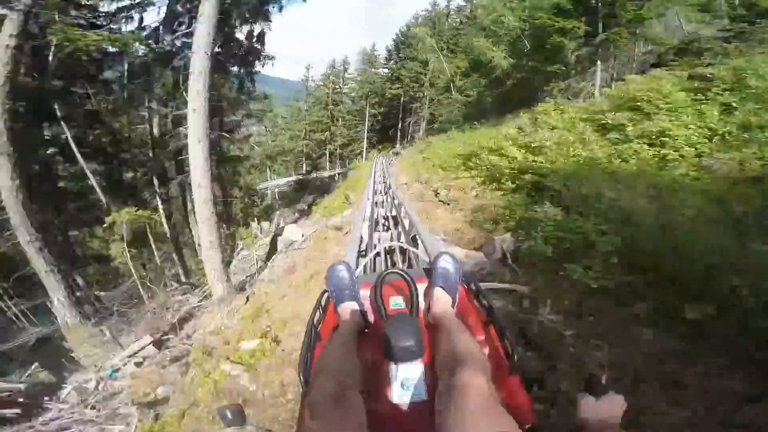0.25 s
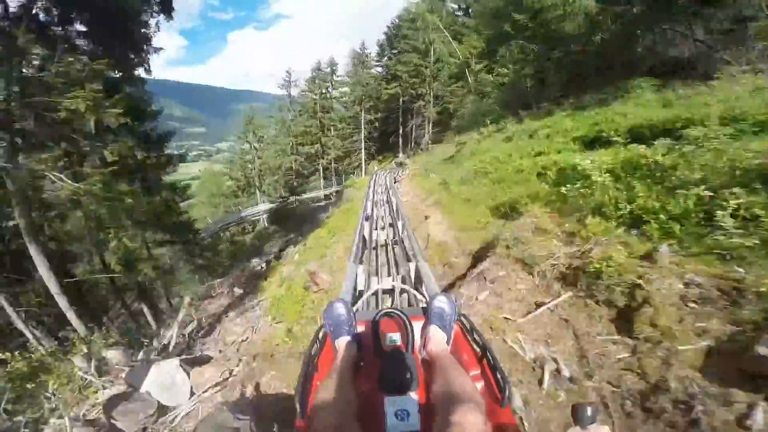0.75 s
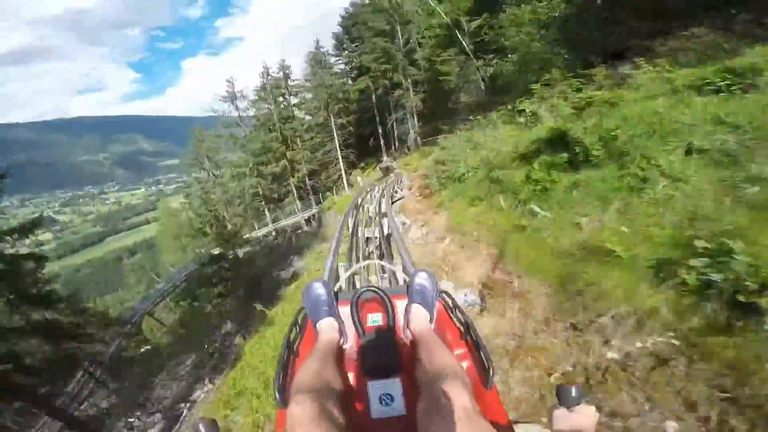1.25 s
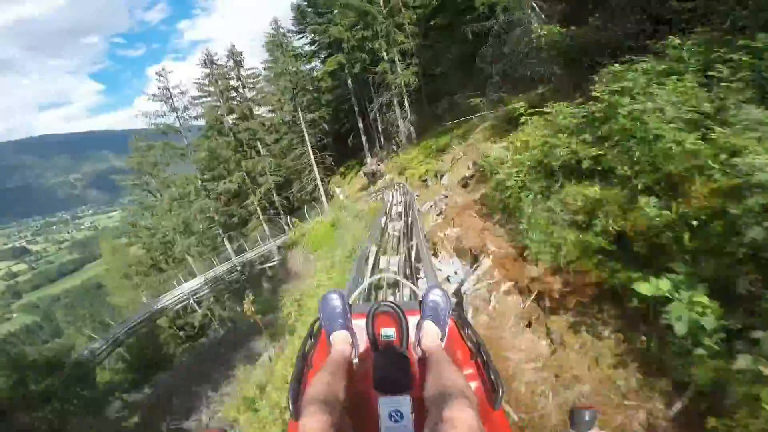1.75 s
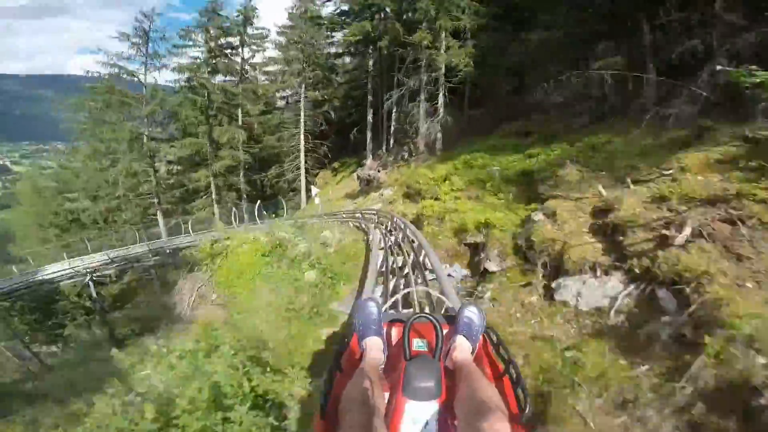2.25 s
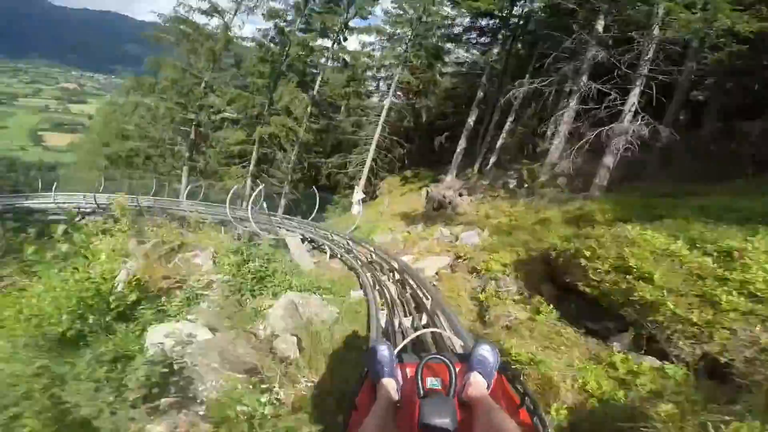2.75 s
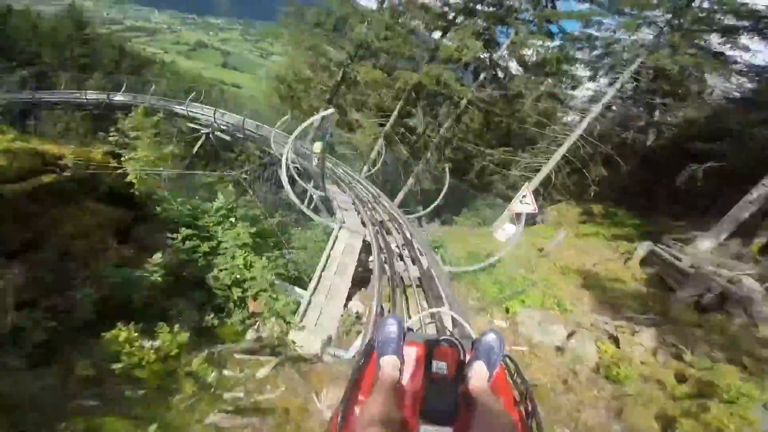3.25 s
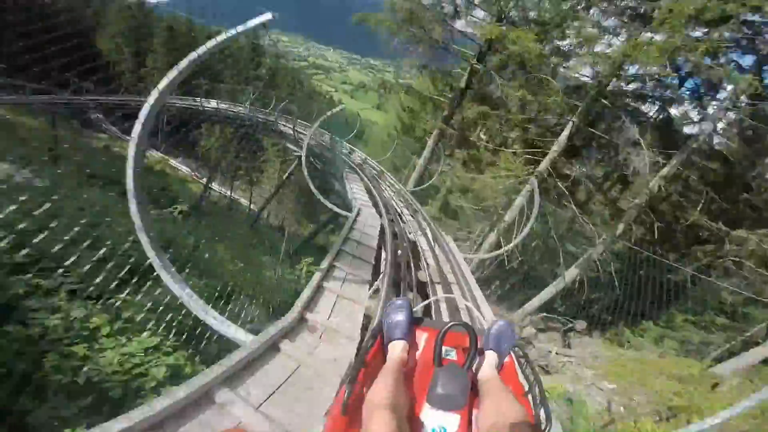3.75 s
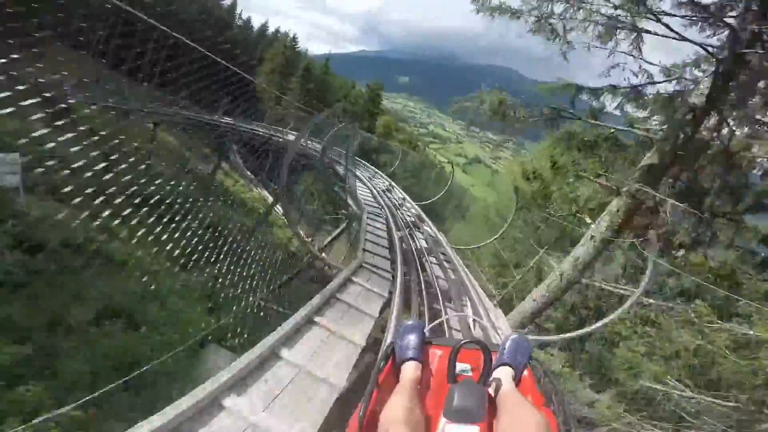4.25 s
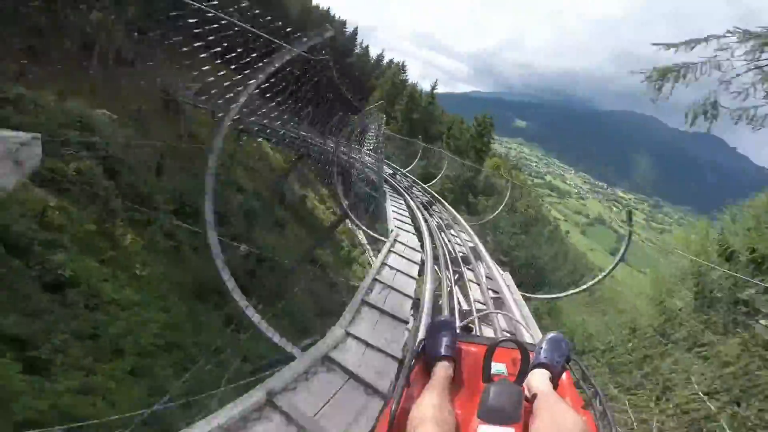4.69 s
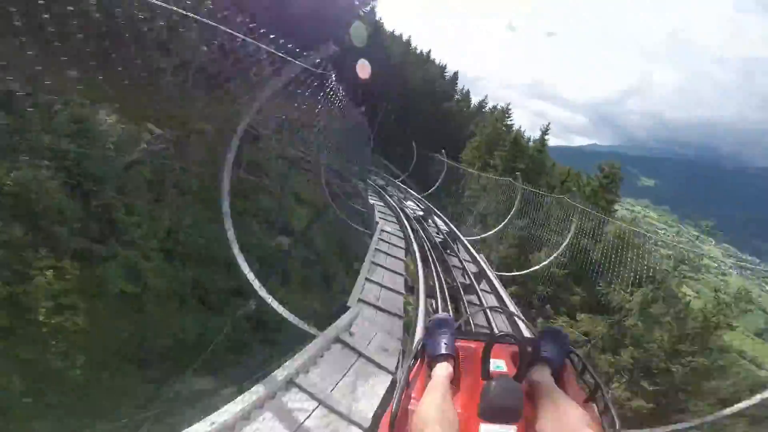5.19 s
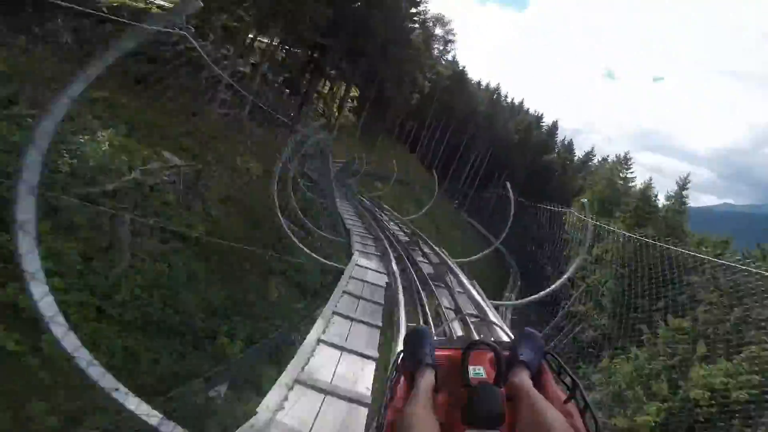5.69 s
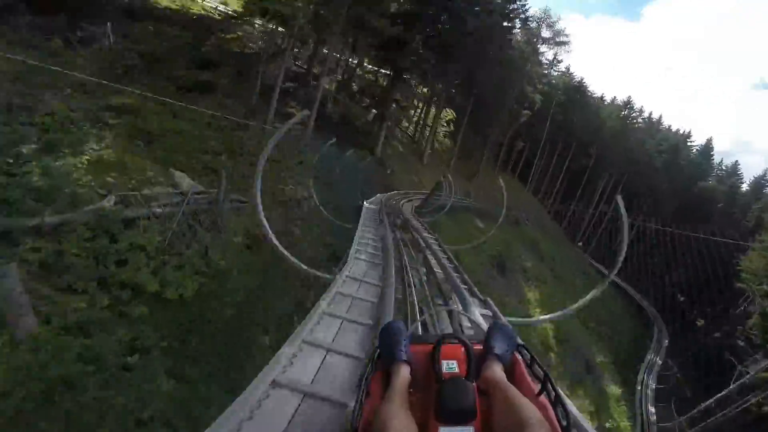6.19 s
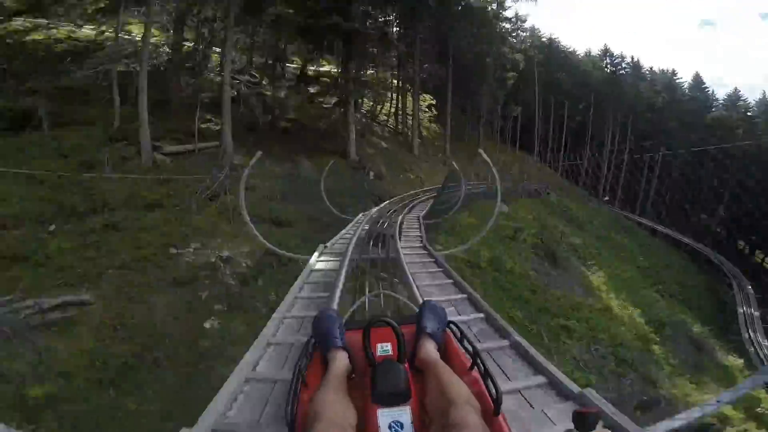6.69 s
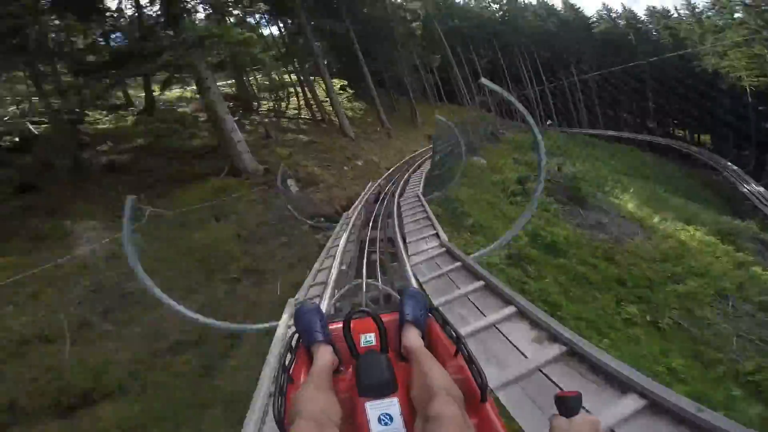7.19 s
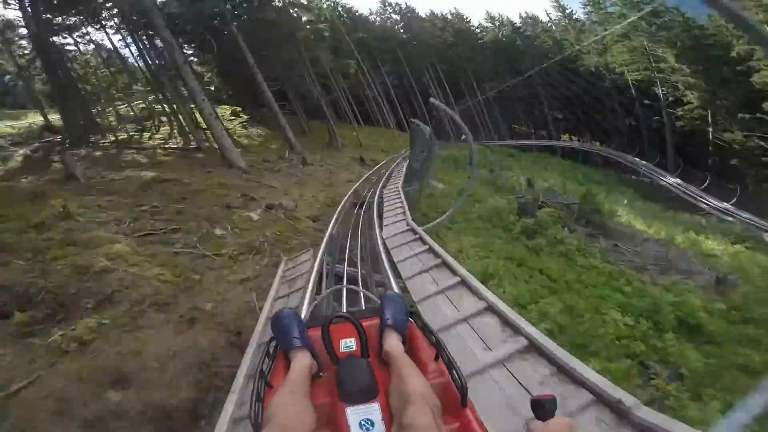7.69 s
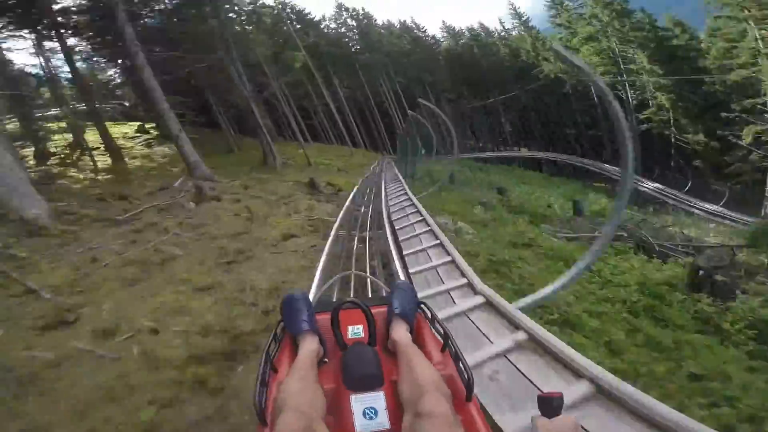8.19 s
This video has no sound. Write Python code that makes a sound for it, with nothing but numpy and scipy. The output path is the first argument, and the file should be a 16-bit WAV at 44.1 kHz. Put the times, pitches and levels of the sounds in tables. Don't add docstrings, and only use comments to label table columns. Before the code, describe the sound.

Close, boxy wheel roar on steel track with low buffeting, rhythmic rasping, scattered joint knocks, scuffs, crackles and a few faint high squeaks.

```python
import sys
import numpy as np
from scipy import signal
from scipy.fft import rfft, irfft, next_fast_len
from scipy.io import wavfile
from scipy.ndimage import uniform_filter1d, map_coordinates

SR = 44100
rng = np.random.default_rng(int(sys.argv[2]) if len(sys.argv) > 2 else 0)


def attenuation_scalar(level_db):
    decades = np.asarray(level_db, float) / 20
    return 10 ** decades


def int16_out(signal):
    q = np.round(np.clip(np.atleast_2d(signal).T, -1, 1) * 32767)
    wavfile.write(sys.argv[1], SR, q.astype(np.int16))


N = 372204

CLOCK_HZ = 2926.6

# time_s, wheel_turns
WHEEL = [(0.0, 0.31), (0.6, 15.79), (0.9, 23.65), (2.7, 71.4), (3.0, 79.01), (3.3, 85.8), (3.6, 92.16),
         (3.9, 98.96), (4.2, 105.44), (5.4, 133.48), (5.7, 140.08), (6.3, 153.68), (6.6, 160.64),
         (6.9, 167.83), (7.2, 174.68), (7.8, 189.19), (8.44, 205.13)]
# time_s, roar_db
LOAD = [(0.0, -44.5), (0.45, -43.5), (0.7, -42), (1.36, -43.5), (1.53, -43), (2.47, -44.5), (2.75, -41.5),
        (3.1, -44.5), (3.24, -44), (4.63, -45), (4.89, -46.5), (5.26, -45), (5.5, -48), (5.85, -46),
        (5.97, -48.5), (6.28, -47.5), (6.42, -47.5), (8.44, -47.5)]
# peak_s, peak_db, rise_and_fall_s
SHUDDERS = [(.08, -23.5, 0.053), (.44, -27.5, .03), (.9, -16, 0.032), (1.07, -17.5, 0.048),
            (1.18, -30, 0.018), (1.36, -25.5, .03), (1.62, -27, 0.033), (2.22, -30, 0.055),
            (2.37, -22, 0.032), (2.76, -30, 0.056), (2.93, -26.5, 0.065), (3.15, -24, 0.024),
            (3.34, -25.5, 0.064), (3.55, -20, 0.026), (3.67, -22.5, 0.026), (3.79, -23.5, 0.035),
            (4.03, -37, 0.045), (4.66, -29.5, 0.063), (5.03, -31, .06), (5.19, -24.5, 0.041),
            (5.52, -30, 0.096), (5.83, -31.5, 0.29), (6.28, -22, 0.039), (6.53, -26, 0.14),
            (6.81, -23.5, 0.028), (6.92, -24, 0.025), (7.52, -24, 0.041), (8.12, -26, 0.17),
            (8.35, -30.5, 0.027)]
# start_s, peak_db, pitch_hz, damping_per_cycle
JOLTS = [(3.155, -15, 189, 1.6), (3.245, -18.5, 170, 0.8), (3.278, -5.5, 111, 0.83),
         (3.293, 1.5, 43.4, 0.84), (3.3, -12.5, 208, 1.9), (3.531, -9.5, 39, 0.63),
         (3.5557, -2.5, 37.9, 1.1), (3.598, -13.5, 198, 1.36), (3.806, -14.5, 111, 1.7),
         (3.966, -14.5, 178, 0.67), (3.988, -11, 105, 1.3), (3.994, -24.5, 216, 0.36),
         (4.0, -9.5, 41.4, .9), (4.011, -10, 101, 1.04), (4.015, -22.5, 213, 0.47), (6.284, -9, 53, 0.86)]
# freq_hz, density_db
ROAR = [(200, -10.5), (330, -3.5), (600, -7.5), (900, -9), (1300, -3.5), (2100, -8.5), (3000, -11),
        (3900, -25.5), (5000, -36.5), (9000, -90)]
# freq_hz, density_db
FIZZ = [(2500, -10), (3400, -1), (4000, -9.5), (5000, -15), (6500, -10.5), (8000, -18.5), (10000, -25),
        (15000, -33)]


def unit(x):
    return x / np.sqrt(np.mean(x ** 2) + 1e-20)


def curves(rows):
    s, *cols = np.transpose(rows)
    return [np.interp(np.arange(N) / SR, s, c) for c in cols]


def wobble(rate):
    knots = rng.standard_normal(int(N * rate / SR) + 4)
    return map_coordinates(knots, [np.arange(N) * rate / SR])


def coloured(x, spectrum, housed=True):
    # centre_hz, width_hz, lift_db
    resonances = [(510, 66, 5.5), (726, 140, 5.5), (1643, 410, 6), (2466, 410, 9), (2803, 200, 4.5),
                  (3153, 140, 3.5), (3685, 170, 4), (4420, 790, 8.5), (5710, 720, 10), (6420, 230, 1),
                  (7780, 360, 3.5)]
    m = 2 * next_fast_len(N // 2 + SR // 2)
    hz = np.fft.rfftfreq(m, 1 / SR)
    f, level = np.transpose(spectrum)
    db = np.interp(np.log(hz + 1), np.log(f + 1), level, left=level[0] - 30)
    if housed:
        db = db + sum(lift / (1 + (2 * (hz - c) / w) ** 2) for c, w, lift in resonances)
    cepstrum = irfft(np.log(attenuation_scalar(np.maximum(db, -170))), m)
    cepstrum[1:m // 2] *= 2
    cepstrum[m // 2 + 1:] = 0
    return irfft(rfft(x, m) * np.exp(rfft(cepstrum)), m)[:N]


def patchy(depth_db):
    z = signal.stft(rng.standard_normal(N + 512), nperseg=512)[2]
    field = uniform_filter1d(rng.standard_normal(z.shape), size=6, axis=0)
    field = uniform_filter1d(field, size=6, axis=1)
    return signal.istft(z * attenuation_scalar(depth_db * unit(field)), nperseg=512)[1][:N]


def add(out, s, piece):
    part = out[round(s * SR):][:len(piece)]
    part += piece[:len(part)]


def steadied(x, share):
    envelope = np.abs(signal.hilbert(x, next_fast_len(N))[:N])
    return unit(x / (envelope + 0.6 * np.std(x)) ** share)


def swells(rows, rest_db):
    t = np.arange(0, N + 64, 64) / SR
    power = attenuation_scalar(rest_db) ** 2
    for s, db, length in rows:
        power = power + (attenuation_scalar(db) / np.cosh(np.clip((t - s) / length, -30, 30))) ** 2
    return np.interp(np.arange(N) / SR, t, np.sqrt(power))


def load_scaled(growth):
    load_db, = curves(LOAD)
    return load_db.mean() + growth * (load_db - load_db.mean())


def wind_sway():
    # peak_s, peak_db, rise_and_fall_s
    gusts = [(.11, -18.5, 0.072), (.49, -26.5, 0.077), (.83, -13, 0.021), (1.12, -12.5, 0.042),
             (1.36, -13.5, 0.027), (1.65, -18.5, 0.077), (1.88, -18, 0.047), (2.22, -19, 0.047),
             (2.44, -15.5, 0.055), (2.72, -22.5, 0.047), (2.93, -20, 0.033), (3.31, -20, 0.032),
             (3.41, -22, 0.053), (3.62, -28, 0.023), (3.7, -18.5, 0.028), (4.0, -18.5, 0.072),
             (4.66, -23, 0.021), (5.0, -30.5, .08), (5.21, -17, 0.035), (5.47, -29, 0.021),
             (5.83, -28.5, 0.17), (6.33, -10.5, 0.033), (6.53, -24, 0.17), (6.82, -29, 0.037),
             (6.92, -14.5, 0.017), (7.24, -18, 0.028), (7.4, -28, 0.024), (7.57, -11.5, .04),
             (7.94, -15.5, 0.043), (8.18, -14.5, 0.036)]
    # freq_hz, density_db
    slow_spectrum = [(8, -31.5), (14, -11), (20, -1), (27, -4.5), (34, -1.5), (42, -18), (60, -83),
                     (400, -170)]
    turn = 2 * np.pi * curves(WHEEL)[0]
    sway = unit(coloured(rng.standard_normal(N), slow_spectrum, housed=False))
    once_a_turn = 0.88 * np.cos(turn + 0.82 * wobble(7.7))
    return swells(gusts, rest_db=-32) * steadied(sway + once_a_turn, share=0.5)


def sled_shudder():
    # freq_hz, density_db
    quick_spectrum = [(30, -33), (40, 4.5), (52, 3), (62, 4), (75, -7.5), (100, -23.5), (130, -39),
                      (600, -170)]
    turn = 2 * np.pi * curves(WHEEL)[0]
    shake = unit(coloured(rng.standard_normal(N), quick_spectrum, housed=False))
    twice_a_turn = 0.5 * np.cos(2 * turn + 1.04 * wobble(7.4))
    return swells(SHUDDERS, rest_db=-33.5) * steadied(shake + twice_a_turn, share=0.74)


def frame_rumble():
    # freq_hz, density_db
    frame_spectrum = [(60, -14), (90, -1), (125, -2.5), (150, -5.5), (205, -5), (255, -14.5), (310, -20.5),
                      (450, -24), (900, -39), (3000, -140)]
    jarred_db, jarred_s = -34.5, 0.0095
    rumble = coloured(patchy(depth_db=-1.3), frame_spectrum, housed=False)
    rumble = unit(attenuation_scalar(0.1 * wobble(30)) * rumble)
    steady = attenuation_scalar(load_scaled(growth=0.57) + 4.5 + 0.47 * wobble(14))
    shaken = attenuation_scalar(-30.5) * swells(SHUDDERS, rest_db=-33.5)
    jarred = swells([(s + jarred_s, db + jarred_db, jarred_s) for s, db, hz, damping in JOLTS], rest_db=-77)
    return (steady + shaken + jarred) * rumble


def rolling():
    shake = wobble(7.7)
    roar_db = load_scaled(growth=1) - 0.2 + 0.4 * shake + 0.75 * wobble(35)
    fizz_db = load_scaled(growth=1.2) - 11 + 1.6 * shake + 0.24 * wobble(30)
    roar = attenuation_scalar(roar_db) * unit(coloured(patchy(depth_db=1.04), ROAR))
    fizz = attenuation_scalar(fizz_db) * unit(coloured(patchy(depth_db=2.15), FIZZ))
    return roar + fizz


def flaw_rasp():
    # freq_hz, density_db
    rasp_spectrum = [(2500, -28.5), (4000, -0.5), (5000, -2.5), (6300, -0.5), (7500, -14), (11000, -15),
                     (15000, -22)]
    turns = curves(WHEEL)[0] + 0.22 + 0.072 * wobble(24)
    since = turns % 1
    strength = attenuation_scalar(3.1 * np.tanh(rng.standard_normal(size=300)))[turns.astype(int)]
    flaw = strength * (1 - np.exp(-since / 0.1)) * np.exp(-since / 0.2) * 2
    return attenuation_scalar(-55.5) * flaw * unit(coloured(patchy(depth_db=2.0), rasp_spectrum))


def crackle():
    clicks = np.zeros(N)
    where, size = rng.random((2, 400))
    clicks[(where * N).astype(int)] = attenuation_scalar(-57 - 3 * np.log(size + 0.06))
    spectrum = [(4000, -26), (8000, 2), (11000, -5), (14000, -7.5), (15200, -31)]  # (freq_hz, density_db)
    return coloured(clicks, spectrum, housed=False)


def camera():
    # multiple, rms_db
    overtones = [(3, -85), (4, -80.5), (5, -81.5)]
    # freq_hz, density_db
    hiss_spectrum = [(3000, -10), (9000, 0), (12500, -1), (14800, -2), (15100, -12), (15300, -50)]
    frame_hz = 29.97
    t = (np.arange(N) / SR) % (1 / frame_hz)
    whine = sum(np.sqrt(2) * attenuation_scalar(db) * np.sin(2 * np.pi * k * CLOCK_HZ * t) for k, db in overtones)
    hiss = attenuation_scalar(-76.5) * unit(coloured(rng.standard_normal(N), hiss_spectrum, housed=False))
    return whine + hiss


def scuffs():
    # start_s, level_db, length_s
    bursts = [(0.121, -47.5, 0.027), (0.96, -51, .02), (1.42, -53, 0.026), (1.616, -60, .02),
              (2.373, -49, 0.023), (2.568, -51, 0.042), (2.92, -50, 0.02), (2.944, -66, .015),
              (3.066, -50, 0.086), (3.24, -51, 0.062), (3.3, -53, .02), (3.521, -47, 0.055),
              (3.61, -62, 0.011), (3.643, -49, 0.048), (3.71, -47, .012), (3.726, -51, .09),
              (3.945, -43, 0.023), (3.97, -49.5, 0.031), (4.59, -58, 0.034), (5.14, -46.5, 0.031),
              (5.692, -44.5, 0.028), (5.735, -50, 0.029), (5.806, -51, .012), (6.283, -53, 0.018),
              (6.887, -47.5, 0.022), (6.92, -52, 0.025), (7.167, -46, .015), (7.568, -50, 0.018),
              (7.59, -50, 0.017), (8.056, -44, 0.012)]
    press, t = np.zeros(N), np.arange(SR // 3) / SR
    for s, db, length in bursts:
        add(press, s, attenuation_scalar(db) * np.exp(-(t / length) ** 2) * (1 - np.exp(-t / 0.005)))
    brighter = [(hz, db + 2.1 * np.log2(hz / 4000)) for hz, db in FIZZ]
    grain = rng.standard_normal(N) * attenuation_scalar(2.9 * wobble(400))
    return press * unit(coloured(grain, brighter))


def joints():
    # start_s, low_db, middle_db, high_db
    knocks = [(1.596, -39, -36, -43), (1.627, -49, -31.5, -42), (3.075, -37, -40, -49),
              (3.134, -36, -40, -50), (3.2176, -41, -51, -51), (3.26, -36, -36, -47),
              (3.2864, -26.5, -30.5, -48), (3.2962, -31, -29, -46), (3.3015, -46, -37, -48),
              (3.5193, -37, -47, -49), (3.5998, -38, -34.5, -46), (3.6973, -28, -41, -48),
              (3.702, -33, -33, -49), (3.7055, -35.5, -43, -65), (3.787, -29.5, -36.5, -43),
              (3.807, -36, -48, -50), (3.9445, -46, -31, -34.5), (3.951, -40, -36, -40),
              (3.9745, -48, -35, -45), (4.0007, -31, -38, -48), (4.0133, -37, -34, -54),
              (4.0983, -42, -43, -45), (4.647, -38, -41, -57), (5.7296, -35, -35, -53),
              (6.3368, -33, -36, -54), (6.7776, -37, -37, -59), (7.2466, -36, -43, -47),
              (7.5202, -50, -41, -53), (7.5775, -29, -28.5, -43.5)]
    modes_hz = [1495, 2390, 3580]
    rise_s, rattle_t60_s = 0.001, 0.026
    ring, loose, t = np.zeros(N), np.zeros(N), np.arange(SR // 3) / SR
    swing = t / rise_s * np.exp(1 - t / rise_s)
    fade = attenuation_scalar(3.5 - 60 * t / rattle_t60_s) * (1 - np.exp(-t / rise_s))
    detunes = 1 + 0.03 * rng.standard_normal((len(knocks), 3))
    for (s, *levels), detune in zip(knocks, detunes):
        modes = zip(modes_hz, levels, detune)
        add(ring, s, swing * sum(attenuation_scalar(db) * np.sin(2 * np.pi * hz * d * t) for hz, db, d in modes))
        add(loose, s, np.sum(attenuation_scalar(np.array(levels))) * fade)
    rattle = coloured(loose * rng.standard_normal(N), ROAR[3:])
    crack = attenuation_scalar(-12.5) * coloured(loose * rng.standard_normal(N), FIZZ)
    return ring + rattle + crack


def snaps():
    # start_s, peak_db, pitch_hz
    clicks = [(1.6227, -52, 9000), (4.7506, -50, 10500), (4.7735, -52, 10000), (4.9102, -42, 12000),
              (4.9546, -51, 10000), (5.0519, -49, 11000), (5.0963, -48, 10500), (5.1407, -66, 11000),
              (5.3587, -60, 10000), (5.495, -80, 10000), (5.8112, -40, 14400), (6.5296, -48, 11000),
              (6.6004, -52, 11000), (6.7411, -48, 12000), (7.0534, -43, 13500), (8.1264, -47, 9400)]
    out, t = np.zeros(N), np.arange(SR // 3) / SR
    for s, db, hz in clicks:
        add(out, s, attenuation_scalar(db - 60 * t / 0.0019) * np.sin(2 * np.pi * hz * t))
    return out


def squeaks():
    # start_s, length_s, start_hz, end_hz, level_db
    glides = [
        (2.865, 0.11, 3370, 3420, -84),
        (3.685, 0.12, 3400, 3440, -66),
        (6.18, 0.03, 3430, 3330, -71),
        (6.255, 0.098, 3380, 3460, -67),
        (6.325, .07, 3300, 3370, -72),
    ]
    # multiple, level_db
    orders = [(2, 3.5), (3, -12), (4, -1)]
    out = np.zeros(N)
    for s, length, start_hz, end_hz, db in glides:
        n = round(length * SR)
        phase = 2 * np.pi * np.cumsum(np.linspace(start_hz, end_hz, n)) / SR
        tone = sum(attenuation_scalar(level) * np.sin(k * phase) for k, level in orders)
        add(out, s, attenuation_scalar(db) * np.sqrt(np.hanning(n)) * tone)
    return out * attenuation_scalar(1.7 * wobble(75))


def jolts():
    out, t = np.zeros(N), np.arange(SR // 3) / SR
    for s, db, hz, damping in JOLTS:
        envelope = np.exp(-damping * hz * t) * (1 - np.exp(-6 * hz * t)) ** 2
        add(out, s, -attenuation_scalar(db) * np.sin(2 * np.pi * hz * t) * envelope)
    return out


def scene():
    body = wind_sway() + sled_shudder() + frame_rumble() + jolts()
    track = rolling() + flaw_rasp() + joints() + scuffs() + squeaks()
    return (body + track + crackle() + snaps())[None]


def thinned(x):
    top_hz, thin_hz, thin_limit = 15000, 12600, -0.5
    hz, t, z = signal.stft(x, SR, nperseg=1024)
    luck = uniform_filter1d(rng.standard_normal((len(hz) // 6 + 1, len(t))), size=3, axis=1)
    busy = 0.6 * np.interp(t, np.arange(N) / SR, wobble(20))
    dropped = np.repeat(unit(luck) + busy < thin_limit, 6, axis=0)[:len(hz)]
    dropped = dropped & (hz > thin_hz)[:, None]
    dropped[np.abs(hz - 5 * CLOCK_HZ) < 150] = False
    gain = np.where(dropped, 0.03, 1) * (hz < top_hz)[:, None]
    return signal.istft(z * gain, SR, nperseg=1024)[1][..., :N]


def band_limit(x):
    return signal.sosfilt(signal.butter(12, 15700, fs=SR, output="sos"), x)


def record(dry):
    soft = dry / (1 + np.abs(dry / 0.8) ** 6) ** (1 / 6)
    mix = thinned(soft + camera())
    return band_limit(mix)


dry = scene()
out = record(dry)
int16_out(out)
```